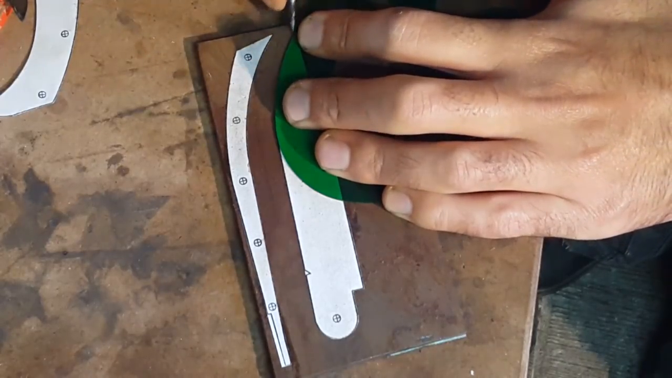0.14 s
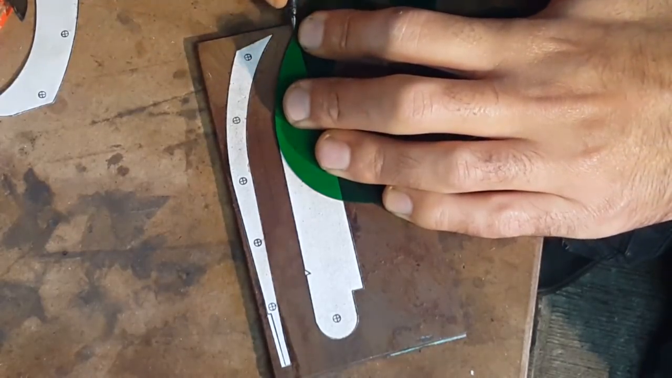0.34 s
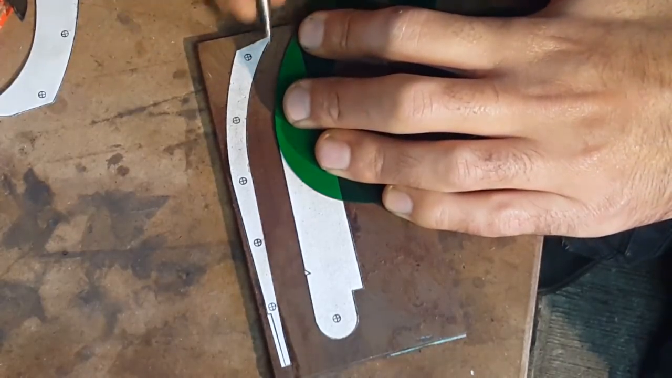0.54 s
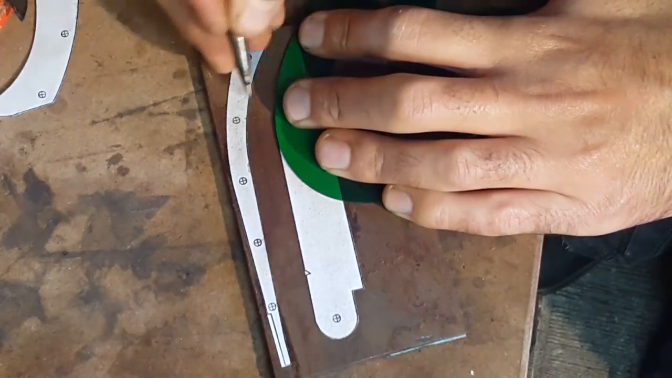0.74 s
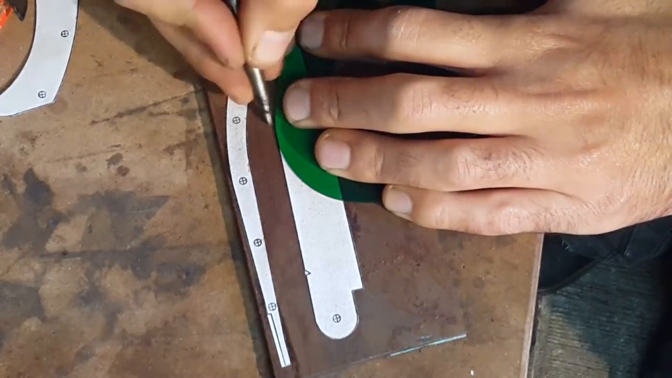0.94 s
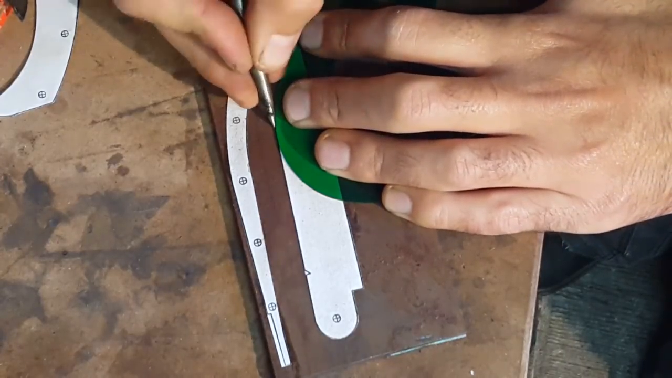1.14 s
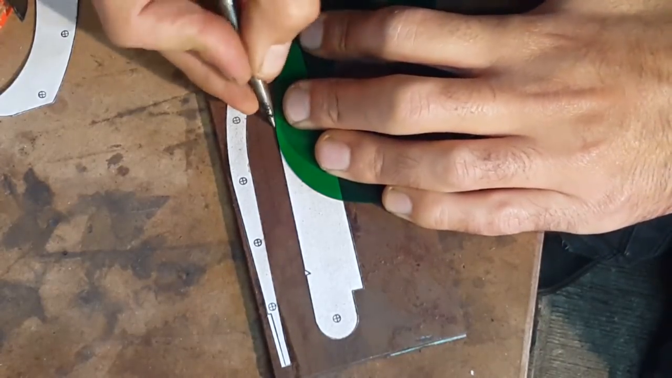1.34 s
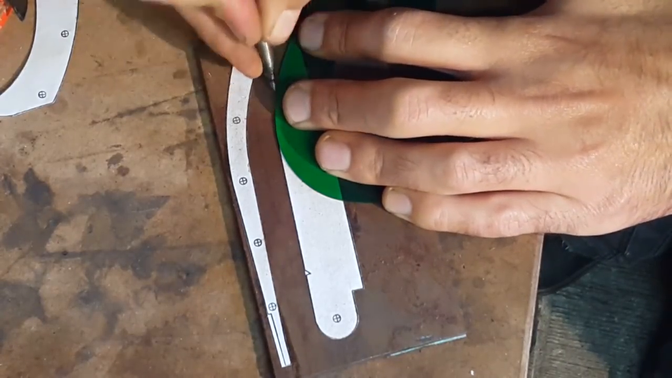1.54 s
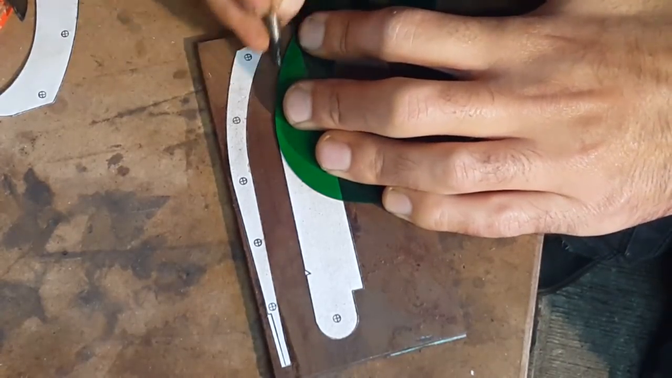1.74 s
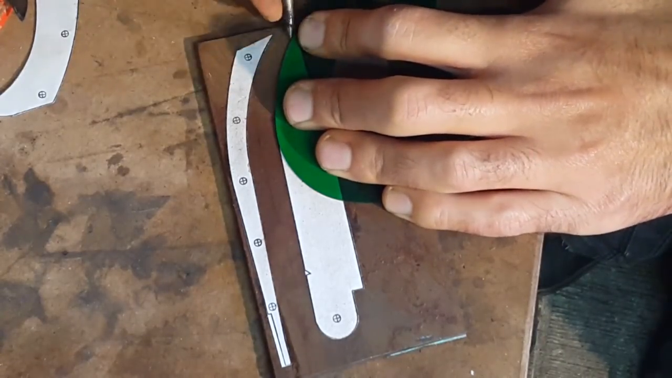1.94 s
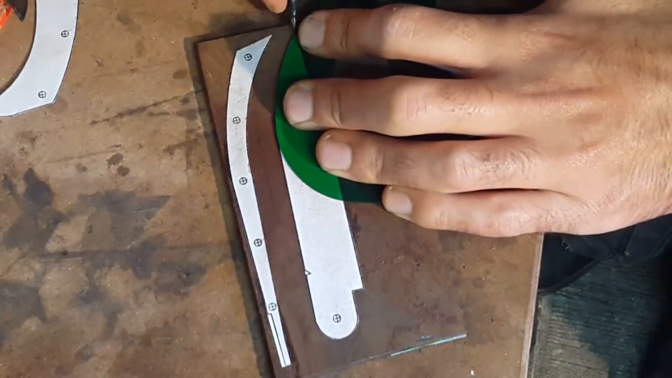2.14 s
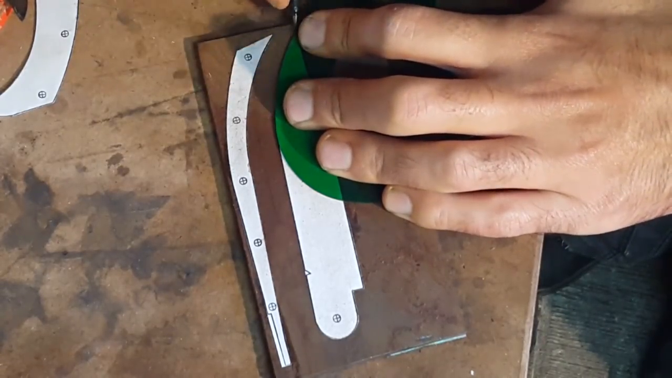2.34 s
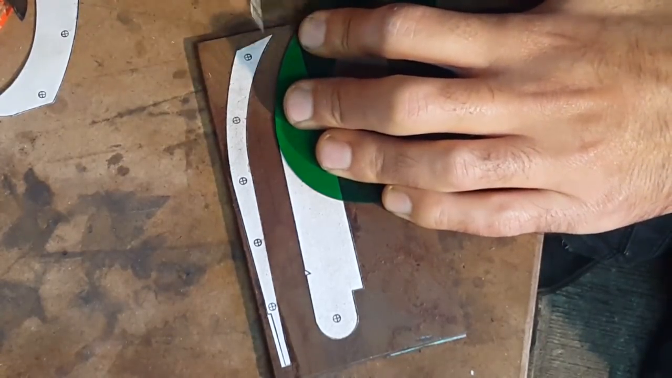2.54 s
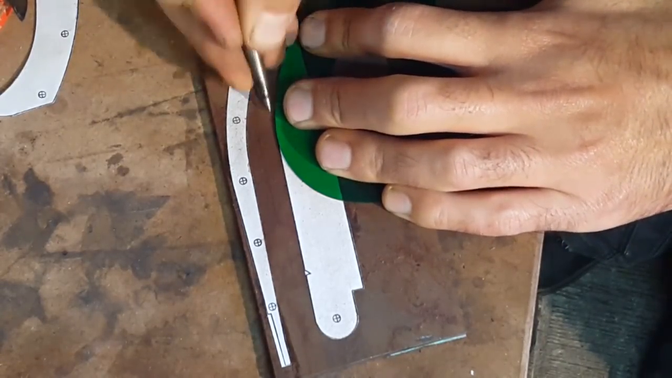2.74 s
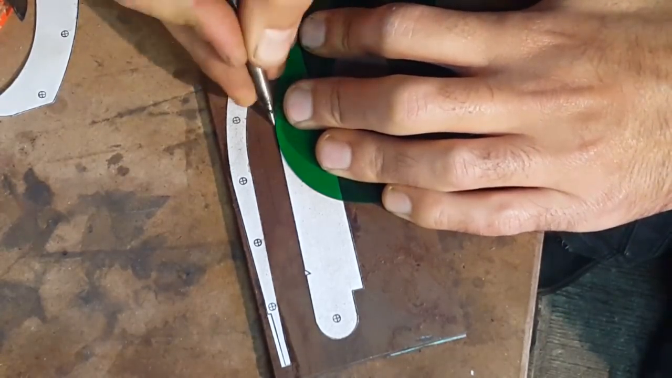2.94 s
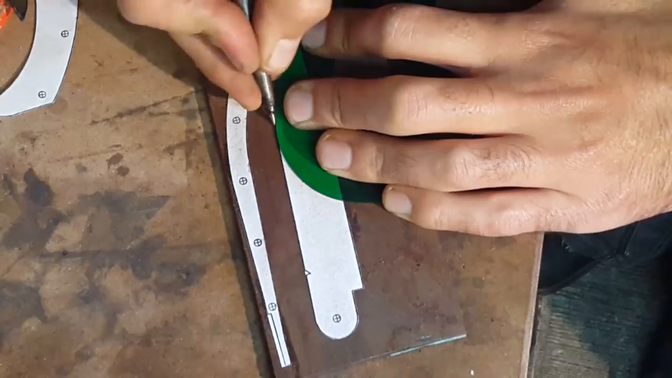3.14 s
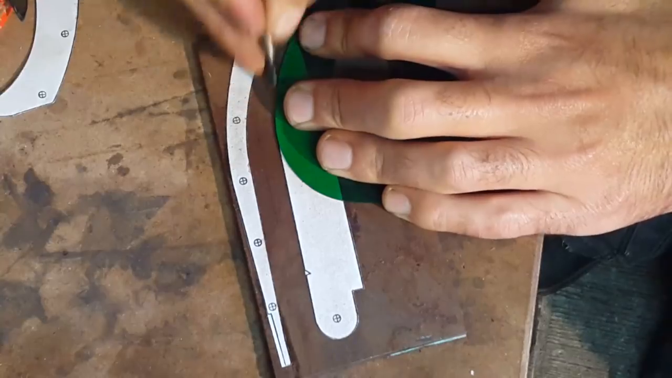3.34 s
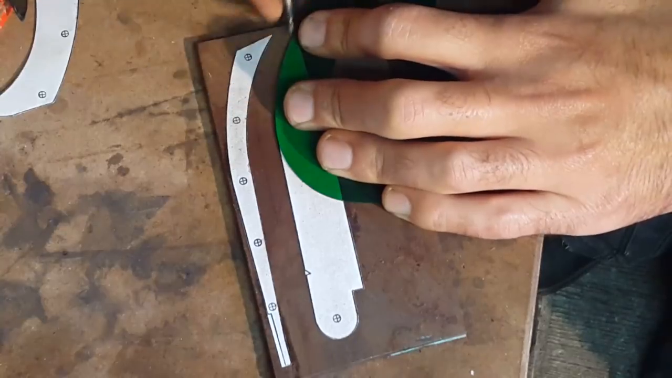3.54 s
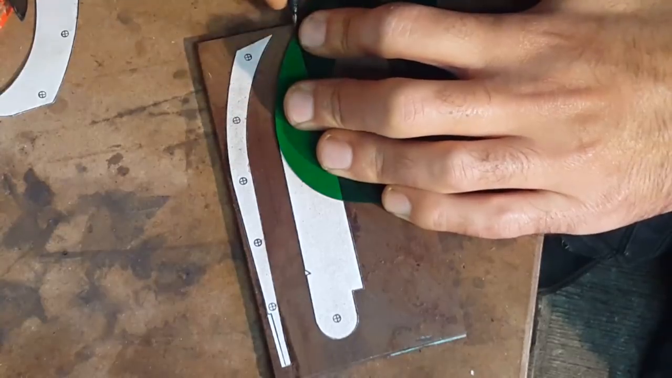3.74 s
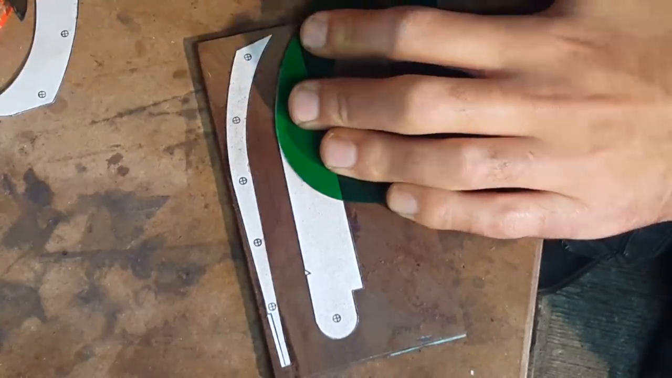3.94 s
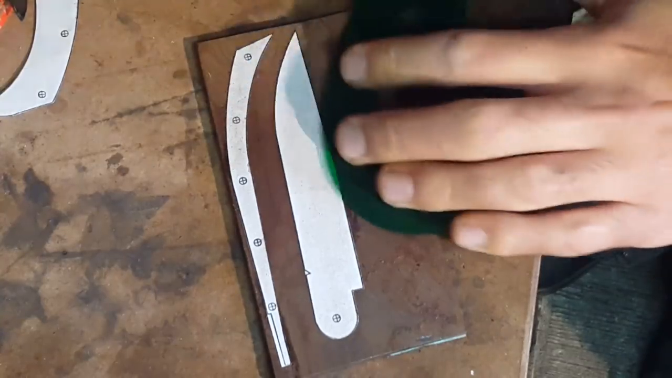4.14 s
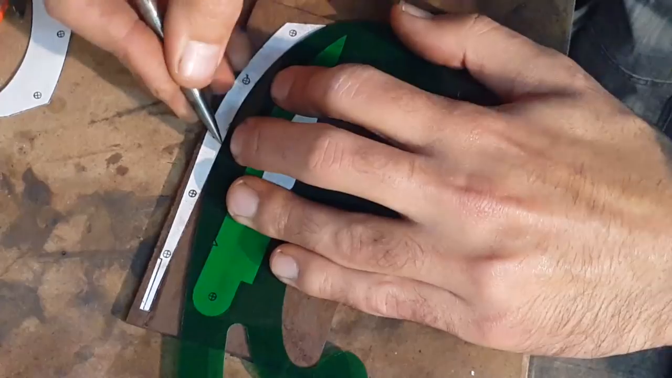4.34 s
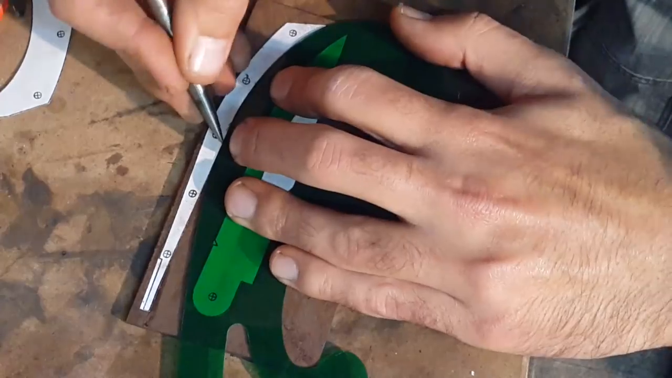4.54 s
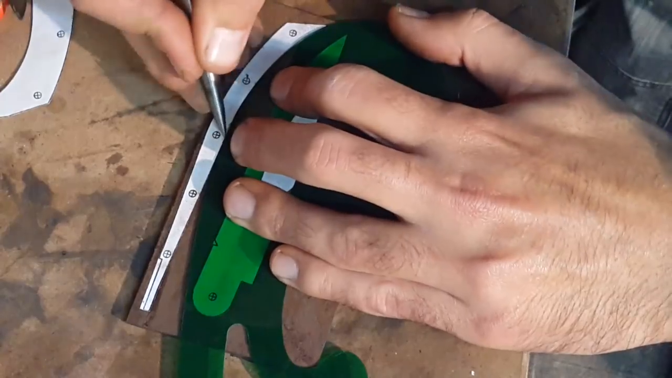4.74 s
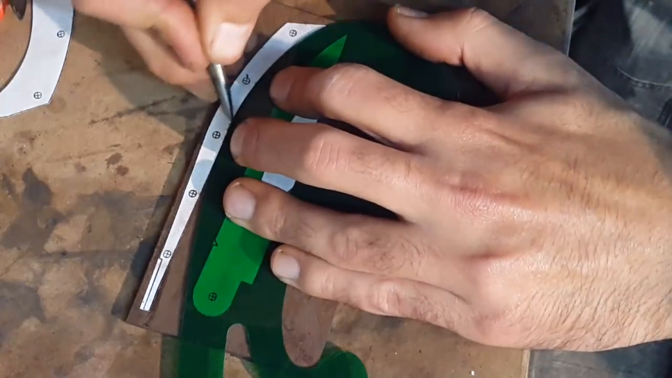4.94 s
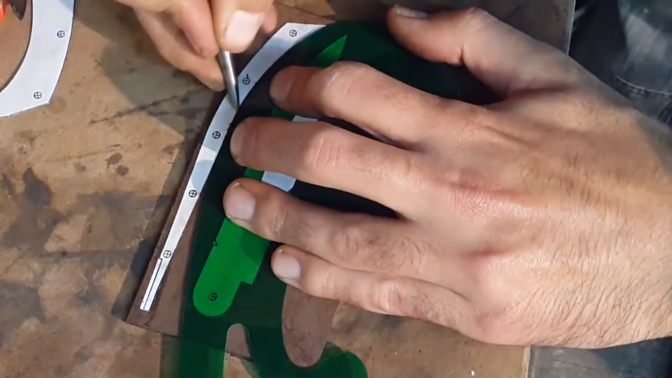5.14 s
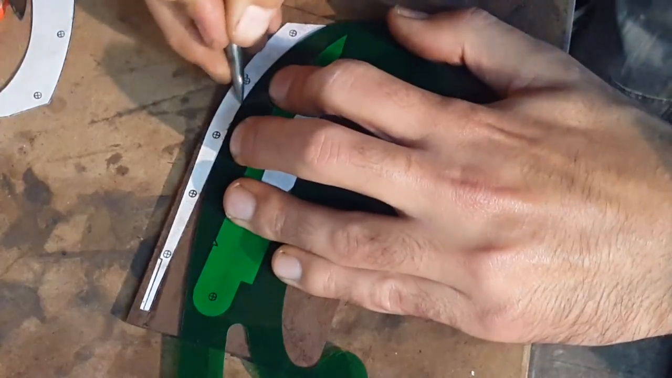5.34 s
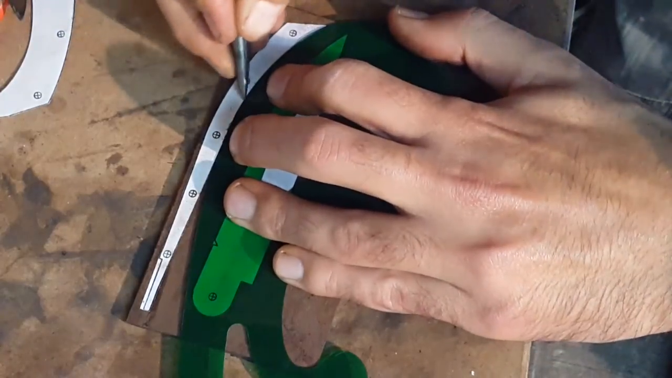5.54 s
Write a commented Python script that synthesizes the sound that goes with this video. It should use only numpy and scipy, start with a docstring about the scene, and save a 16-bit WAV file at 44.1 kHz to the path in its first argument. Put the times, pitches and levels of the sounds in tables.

```python
"""A steel scribe jerks along a plastic template over a plate on a wooden board, close up in a quiet workshop.
Every jerk or tap is a burst of tiny slips, with a snap just after they set in, that rings the modes of board,
plate and scribe. The bench thuds below; grit hisses under finger and template; the template hums as it is
dragged aside. Then the board is turned and the modes change level. Faint high notes and room tone lie behind.
Two microphone ports hear each mode differently; the shop answers with a short reverberation."""
import sys
import numpy as np
from scipy import signal
from scipy.io import wavfile

SR = 44100
rng = np.random.default_rng(int(sys.argv[2]) if len(sys.argv) > 2 else 0)


def unload_wav(signal):
    """Save mono or channel-first audio to the path in sys.argv[1] as 16-bit WAV at rate SR, clipped to [-1, 1]."""
    wavfile.write(
        sys.argv[1],
        SR,
        np.round(np.clip(np.atleast_2d(signal).T, -1, 1) * 32767).astype(np.int16),
    )


N = 250920  # samples

# jerks and taps of the point: [t/s, relative level/dB, rise/s, bass fade t60/s,
# then against that level: weight/dB, plate/dB, bite/dB, treble/dB]
JERKS = [(0.0,-23.5,0.0046,0.14,-16,-17,-15.5,-25), (0.029,-35.5,0.0073,0.19,-1,1,-12,-27),
         (.058,-38.5,0.0015,0.24,-2,-9,-1.5,-20), (.299,-43,0.0093,0.18,-3,-1,-6,-25),
         (.539,-43.5,0.0038,0.083,-25,-13,-9,-28), (0.859,-46,.015,0.086,-16,-6,-11,-17.5),
         (.886,-39.5,0.0013,0.23,-17,-15,-10,-25), (1.136,-39,.006,.1,-25,-15.5,-44,-48),
         (1.274,-51,.005,.1,-17,-13,-24,-23), (1.541,-48.5,0.007,0.96,-8,-11,-20,-30),
         (1.591,-38.5,0.0055,0.31,-8,-9,-21,-22.5), (1.611,-36.5,0.0035,0.37,-10.5,-5.5,-18,-21),
         (1.633,-34.5,0.011,0.37,-2,0.5,-14,-20.5), (1.661,-28.5,0.008,0.17,-22,-3,-13.5,-25),
         (1.686,-32,0.0071,0.056,-6.5,5,-26,-25), (1.753,-27,0.013,0.1,-16,-8.5,-15.5,-29.5),
         (1.773,-34.5,0.0022,0.38,-8,-20,-3,-24.5), (1.844,-31.5,0.0039,0.62,-10,-10,-5.5,-23.5),
         (1.877,-25.5,0.0089,0.49,-12.5,-9,-5.5,-34), (1.923,-21,0.0054,0.35,-18.5,-13,-10,-29),
         (1.97,-29.5,0.0041,0.16,-17,-28,-11,-28.5), (2.019,-26.5,0.0075,0.18,-14.5,1.5,-1,-23),
         (2.05,-23.5,0.0025,0.14,-13.5,-23,-13,-32), (2.19,-28,0.0035,0.2,-9.5,-6,-14.5,-32),
         (2.218,-28,0.0065,0.11,-15.5,-12.5,-8.5,-26), (2.316,-46.5,0.0055,0.32,-8,-19,-15,-22.5),
         (2.398,-27.5,0.0048,0.1,-12.5,-16.5,-16,-27.5), (2.603,-43.5,0.0067,0.15,-27,-20.5,-21.5,-35),
         (2.754,-68.5,0.015,.21,7,-11,3,-8), (3.038,-28.5,0.0019,0.13,-28.5,-10.5,-35,-33),
         (3.074,-36,0.016,0.13,-20,-12.5,-26,-33), (3.321,-44,0.0076,.22,-9,-21,-21,-32),
         (3.353,-38,0.0076,0.14,-23,-7.5,-20,-30), (3.375,-40.5,0.0027,0.31,-7.5,-11.5,-12.5,-19.5),
         (3.445,-27.5,0.022,0.69,-15,-8.5,-16.5,-27), (3.481,-26,0.0084,0.059,-29,0.5,-20,-30),
         (3.548,-27.5,0.021,0.27,-8.5,-8.5,-7,-29), (3.583,-25,0.0052,0.098,-21.5,-13,-8,-25.5),
         (3.602,-36,0.0026,0.35,-9,-3,-3.5,-22.5), (3.651,-28.5,0.011,0.37,-10,-2,-3,-21.5),
         (3.697,-34,0.0034,0.26,-12,-14,-6,-19), (3.777,-32.5,0.0053,0.094,-9,-14,-2,-29),
         (3.813,-38.5,0.0066,0.22,-12.5,-38,-6,-43), (4.366,-61,0.0054,0.12,-12,-22,-11,-19),
         (4.802,-38,0.0037,0.2,-20,-10,-20,-33.5), (4.851,-40.5,0.01,0.16,-20,-15,-16,-23),
         (4.898,-60,.007,.14,-14,-18,1,-8), (4.991,-33,0.036,.3,-19,-16,-28,-33),
         (5.023,-21,0.0086,0.055,-43,-17.5,-50,-46), (5.037,-22,0.0041,0.22,-30,-15.5,-30,-29.5),
         (5.052,-32,0.0059,0.21,-17,-8.5,-10,-22.5), (5.115,-27.5,0.014,.1,-26,-14,-15,-25.5),
         (5.129,-26,0.013,0.12,-16,-7,-7,-23.5), (5.168,-38.5,0.0083,0.24,-10.5,-21,0.5,-35),
         (5.251,-41,0.0063,0.39,-12,-12.5,-6,-26.5), (5.323,-36,0.0051,0.077,-7.5,-14,-12,-27.5),
         (5.338,-30.5,0.0025,0.14,-13.5,-16.5,-7,-28.5), (5.398,-53,.007,0.14,-3,-15,-1,-19),
         (5.486,-29.5,0.0039,0.12,-21,-10,-22,-28), (5.505,-27.5,0.0076,0.08,-14.5,-7,-12.5,-25.5),
         (5.517,-45,.006,0.27,-1,-4,0,-14)]
# colour of a jerk: [f/Hz, level/dB]; weight acts on the first point, plate on the third,
# bite on the fourth, treble on the last three
JERK_COLOUR = [(250, -2.23), (730, -2.26), (1250, -1), (2000, -8), (3000, -6), (4800, -6.5), (7000, -11)]
# modes of board, plate and scribe: [f/Hz, t60/s, right level/dB, left minus right level/dB,
# left lead/rad, level change once the board is turned/dB]
MODES = [(99.2, 0.41, -12, -4.5, -0.2, 3), (133.2, 0.19, -1, -1, 0.35, -2),
         (211, 0.064, -3.5, -3.5, -0.07, 5), (322, 0.13, -2, -1, 0.5, -1.5),
         (369.1, 0.19, -5, 0, -0.5, -4.5), (502.5, 0.044, -7.5, -4, 1.5, -0.5),
         (595.4, 0.11, -10.5, -7, 0.97, 9.5), (703, 0.044, 6, -14, -1, -2), (757, 0.027, 6.5, -27, 1.8, -4),
         (803, 0.067, -7, -32.5, -1.5, -16), (864, 0.099, -6, -25.5, 0.8, -0.5),
         (999, 0.033, 0, -11.5, 4.5, -3), (1021, 0.05, -0.5, -15.5, 5.5, -1),
         (1206, 0.032, 2.5, -16.5, -5.1, -1.5), (1360, 0.033, 1, 0, 4.5, 2.5),
         (1398, 0.025, 1.5, 0.5, -2.14, 1), (1523, 0.069, -1, -26, -2, 0),
         (1703, 0.026, 1, -1.5, -0.6, -3.5), (1886, 0.026, 4, -9, 3, -6), (1999, 0.1, -4, 4.5, 2, -8.5),
         (2140, 0.061, 0.5, -5, 1.1, -6.5), (2317, 0.044, 3, -6, -1, -3), (2807, 0.028, -2.5, -3, -3, 7),
         (3018, 0.016, -3.5, 11, 0.64, -2.5), (3840, 0.0049, -3, 6, 6.5, -1),
         (4180, 0.014, 2.5, 2.5, -2, -3), (4660, 0.0077, -2, 8, -4, 3.5), (6000, 0.0055, 0, -5.5, 1, -1.5),
         (7017, 0.019, 8.5, -5, 2.5, 0), (11500, .008, -7.5, -17, 8, 3)]
# sway of the bench under the pressing hand: [t/s, level/dB before the port gains]
BENCH = [(0.0, -51), (0.24, -72.5), (0.33, -65), (0.41, -73), (1.44, -77), (1.88, -47.5), (2.31, -54),
         (2.6, -77), (2.66, -62), (2.85, -72), (3.33, -70.5), (3.41, -60), (3.63, -54.5), (3.71, -65),
         (4.52, -77), (4.83, -66.5), (5.66, -66), (5.69, -80)]
# room tone, spectrum: [f/Hz, relative level per Hz/dB]
AIR = [(25, -14), (45, 7), (70, -4.5), (200, 0.5), (260, -3.5), (420, -3), (520, 5), (620, -13), (760, 2.5),
       (950, -13), (1400, -13.5), (2500, -19.5), (4000, -24), (6500, -28.5), (10000, -29), (16000, -27)]
# room tone, balance of the ports: [f/Hz, left minus right level/dB]
AIR_BALANCE = [(60, -2), (300, -1), (540, -5), (730, -11), (1000, -2), (3300, 1), (4500, 5), (6000, -1),
               (15000, -1)]
# room tone, likeness of the ports: [f/Hz, correlation from -1 to 1]
AIR_LIKENESS = [(40, .95), (100, .75), (700, .6), (1000, -.2), (2000, .1), (8000, 0)]
# grit, one list under the sliding finger, one under the sliding template: [t/s, level/dB]
GRIT = [
    [(0.62, -95), (0.65, -98), (0.674, -76), (0.844, -75.5), (0.866, -61.5), (0.974, -72), (0.99, -83)],
    [(4.09, -91), (4.114, -61), (4.122, -70.5), (4.186, -59.5), (4.284, -73), (4.3, -86)],
]
# treble resonances of the grit under the finger: [f/Hz, width/Hz, relative level/dB]
FINGER_PEAKS = [(2440, 1300, -12.5), (4500, 4800, -17)]
# treble resonances of the grit under the template: [f/Hz, width/Hz, relative level/dB]
TEMPLATE_PEAKS = [(5060, 1800, 17.5), (7110, 91, 15), (5800, 2000, 5), (4100, 720, -11), (9500, 3500, -32)]
# faint high notes, perhaps birds outside: [t/s, length/s, first f/Hz, last f/Hz, level/dB]
CHIRPS = [(1.152, 0.13, 4300, 5850, -78), (2.337, 0.18, 4250, 4260, -79.5), (3.951, .12, 4200, 4600, -79),
          (4.158, .13, 4130, 3810, -67), (5.205, 0.12, 4080, 3970, -75), (5.567, 0.13, 4150, 3850, -70)]
# the dragged template sticks and lets go, and the board hums: [t/s, peak level/dB before the port gains]
JUDDERS = [(3.813, -49), (3.839, -53.5), (3.894, -46), (3.966, -51), (4.033, -49.5), (4.108, -52),
           (4.14, -47.5), (4.221, -51.5), (4.257, -57), (4.322, -59), (4.349, -79), (4.389, -69),
           (4.452, -83)]

SLIPS_PER_S, SLIP_SPREAD_DB = 4000, 1.5
CHATTER_HZ, CHATTER_DB = 94, 0.5  # pace and depth of the clumps of slips
JERK_DB, STRIKE_SPREAD_DB = -5, 1.5  # common gain; chance spread for each jerk and mode
TREBLE_FADE_HZ = 8550  # at this pitch a jerk fades twice as fast as in the bass
SNAP_DB, SNAP_LOSS_DB_PER_S = 27, 596  # the slower a jerk rises, the weaker its snap
CONTACT_S = 0.00025  # a blunt contact: the snap reaches the high modes less
TAP_PAUSE_S = 0.1  # a jerk after so long a pause is a tap: the point lands afresh
TAP_SNAP_DB, TAP_CLICK_DB, TAP_RING_DB = 1, 11, -8  # a tap snaps and clicks more, rings the scribe less
APART_HZ = 2480  # above this pitch the ports hear mostly unlike slips
TURNED_S = 4.5
SHOP_T60_S, WALL_CUT_HZ, SHOP_LOW_HZ, SHOP_DB = 0.19, 9300, 350, -8
BENCH_HZ, BENCH_WIDTH_HZ = 71, 6
AIR_DB = -63
CHIRP_EDGE_S = 0.017  # soft ends
JUDDER_RISE_S, JUDDER_T60_S = 0.016, 0.3
DRAG_HZ, DRAG_SAG_HZ_PER_S = 705, 25  # pitch at the first judder, and its fall
DRAG_WIDTH_HZ = 90
DRAG_CLEAR_UNTIL_S, DRAG_BREAK_UP_S = 4.08, 0.06  # the hum is clear at first, then breaks up into noise
RUMBLE_CUT_HZ, CUTOFF_HZ = 42.4, 15900


def from_db(db):
    """Decibels to amplitude gain."""
    return 10 ** (np.asarray(db) / 20)


def rms_one(x):
    """Scales a signal to rms 1."""
    return x / np.sqrt(np.mean(x ** 2) + 1e-20)


def in_time(rows):
    """Columns of a curve at every sample, after a gate that fades out just beyond its ends."""
    s, *columns = np.transpose(rows)
    t = np.arange(N) / SR
    gate = np.clip(np.minimum(t - s[0], s[-1] - t) / 0.008 + 1, 0, 1)
    return [gate] + [np.interp(t, s, column) for column in columns]


def at_hz(points, hz):
    """Reads a spectrum on a log frequency axis."""
    f, level = np.array(points).T
    return np.interp(np.log(hz), np.log(f), level)


def ring(force, hz, t60, lead=0.0):
    """One damped mode as a two-pole resonator, started at a given phase; steady unit noise gives rms 1."""
    r = from_db(-60 / (t60 * SR))
    w = 2 * np.pi * hz / SR
    start = np.array([np.sin(lead), r * np.sin(w - lead)])
    b = np.sqrt(2 * (1 - r * r)) * start
    return signal.lfilter(b, [1, -2 * r * np.cos(w), r * r], force + 1e-18)


def slips(per_s, spread_db):
    """Stick-slip friction: random tiny slips of uneven size that come in clumps; rms 1."""
    size_db = spread_db * np.minimum(rng.exponential(1, N), 5)
    sizes = from_db(size_db) * rng.choice([-1, 1], N)
    r = np.exp(-2 * np.pi * CHATTER_HZ / SR)
    clumps = rms_one(signal.lfilter([1], [1, -2 * r, r * r], rng.standard_normal(N)))
    happens = rng.random(N) < per_s / SR
    return rms_one(sizes * happens * from_db(CHATTER_DB * clumps))


def wavering(hz, width_hz, steady=0.0):
    """A tone that follows a pitch track, blurred by slow noise around a steady part; rms 1."""
    r = np.exp(-np.pi * width_hz / SR)
    slow = rms_one(signal.lfilter([1], [1, -r], rng.standard_normal((2, N))))
    phase = 2 * np.pi * np.cumsum(hz + np.zeros(N)) / SR
    return rms_one((steady + slow[0]) * np.cos(phase) + slow[1] * np.sin(phase))


def scratching():
    """Each jerk is a snap amid slips; it drives every mode of board, plate and scribe at its own strength."""
    s, level_db, rise, fade, weight, plate, bite, treble = np.transpose(JERKS)[:, :, None]
    rise = np.maximum(rise, 0.001)
    tap = np.diff(s, axis=0, prepend=0) > TAP_PAUSE_S
    t = np.arange(N) / SR
    ms = np.arange(0, N / SR + 0.002, 0.001)  # a coarse clock in s, for the envelopes
    age = ms - s + 0.0033  # the slips set in just before the catch
    decay = from_db(-120 * np.clip(age - rise, 0, 1) / np.maximum(fade, 0.01))
    power = np.clip(age / rise, 0, 1) ** 2 * decay
    luck = rng.normal(0, STRIKE_SPREAD_DB, (len(JERKS), len(MODES)))
    train = slips(SLIPS_PER_S, SLIP_SPREAD_DB)
    other = slips(SLIPS_PER_S, SLIP_SPREAD_DB)
    snap_at = (np.maximum(s[:, 0] - 0.002, 0) * SR).astype(int)
    colour_axis = np.log(np.array(JERK_COLOUR)[:, 0])
    out = np.zeros((2, N))
    for k, (hz, t60, right_db, left_db, lead, turned_db) in enumerate(MODES):
        # how much each colour point counts at this pitch
        share = [np.interp(np.log(hz), colour_axis, row) for row in np.eye(7)]
        colour_db = at_hz(JERK_COLOUR, hz) + share[0] * weight + share[2] * plate
        colour_db = colour_db + share[3] * bite + sum(share[4:]) * treble
        colour_db += tap * (share[4] * TAP_CLICK_DB + share[6] * TAP_RING_DB)
        mode_db = right_db + turned_db * (s > TURNED_S)
        strength = from_db(JERK_DB + level_db + colour_db + mode_db + luck[:, [k]])

        # higher up the left port hears other parts of the plate, stirred by slips of their own
        alike = 1 / np.hypot(1, hz / APART_HZ)
        trains = np.array([alike * train + np.sqrt(1 - alike ** 2) * other, train])
        mode_power = power ** (1 + hz / TREBLE_FADE_HZ)
        envelope = np.sqrt((strength ** 2 * mode_power).sum(axis=0))
        force = trains * np.interp(t, ms, envelope)
        snap_db = SNAP_DB + tap * TAP_SNAP_DB - SNAP_LOSS_DB_PER_S * rise
        snap = (strength * from_db(snap_db))[:, 0]
        force[:, snap_at] += snap / np.hypot(1, hz * CONTACT_S)

        # the plate passes little of a mode far above its pitch
        soften = signal.butter(2, min(2.2 * hz, 18000), fs=SR, output="sos")
        left, right = signal.sosfilt(soften, force + 1e-18)
        sense = (-1) ** k  # neighbouring modes move in opposite senses
        out[0] += sense * from_db(left_db) * ring(left, hz, t60, lead)
        out[1] += sense * ring(right, hz, t60)
    return out


def shop(x):
    """Reverberation of the shop: ten feedback delays a side, duller on every round."""
    out = np.zeros((2, N))
    dull = np.exp(-2 * np.pi * WALL_CUT_HZ / SR)
    lags = (np.geomspace(0.0231, 0.0603, 20) * SR).astype(int)
    for k, lag in enumerate(lags):
        loop = x[k % 2].copy()
        gain = from_db(-60 * lag / SR / SHOP_T60_S)
        state = [0.0]
        for i in range(lag, N, lag):  # one block per round trip
            back, state = signal.lfilter([gain * (1 - dull)], [1, -dull], loop[i - lag:i], zi=state)
            loop[i:i + lag] += back[:N - i]
        echoes = loop - x[k % 2]
        out[k % 2] += echoes * (-1) ** (k // 2)
    return out


def bench():
    """The bench sways in one low wavering mode, the same at both ports but for a small level offset."""
    _, level_db = in_time(BENCH)
    port_gain = from_db([[-1], [0.8]])
    return from_db(level_db) * wavering(BENCH_HZ, BENCH_WIDTH_HZ, steady=2.5) * port_gain


def air():
    """Room tone: third-octave bands of stereo noise, each with its own level, balance and likeness."""
    out = 0
    edges = 25 * 2 ** np.arange(0, 9.6, 1 / 3)
    white = rng.standard_normal((2, 2, N))  # neighbouring bands get unrelated noise
    for k, (low, high) in enumerate(zip(edges, edges[1:])):
        band = signal.butter(2, [low, high], "band", fs=SR, output="sos")
        mid, side = signal.sosfilt(band, white[k % 2])
        hz = np.sqrt(low * high)
        alike = np.clip(at_hz(AIR_LIKENESS, hz), -1, 1)
        balance_db = at_hz(AIR_BALANCE, hz) * np.array([[0.5], [-0.5]])
        gain = from_db(at_hz(AIR, hz) + balance_db)
        out = out + gain * (np.sqrt(1 + alike) * mid + np.sqrt(1 - alike) * side * [[1], [-1]])
    return from_db(AIR_DB) * rms_one(out)


def grit():
    """Dense grains crushed under a slide ring broad treble resonances, with separate grains at each port."""
    out = np.zeros((2, N))
    for slide, peaks in zip(GRIT, (FINGER_PEAKS, TEMPLATE_PEAKS)):
        gate, level_db = in_time(slide)
        for port in range(2):
            grains = slips(per_s=2800, spread_db=4.0)
            hiss = np.zeros(N)
            for hz, width_hz, peak_db in peaks:
                t60 = np.log(1000) / np.pi / width_hz
                hiss += from_db(peak_db) * ring(grains, hz, t60)
            # sqrt(2): the table gives the level of the two ports' mean
            out[port] += gate * from_db(level_db) * np.sqrt(2) * rms_one(hiss)
    return out


def chirps():
    """Faint blurred high notes, each a straight glide with soft ends, blurred separately at each port."""
    out = np.zeros((2, N))
    t = np.arange(N) / SR
    for s, length, first_hz, last_hz, level_db in CHIRPS:
        gate = np.clip(np.minimum(t - s, s + length - t) / CHIRP_EDGE_S, 0, 1)
        hz = np.interp(t, [s, s + length], [first_hz, last_hz])
        notes = np.array([wavering(hz, width_hz=170) for port in out])
        out += gate * from_db(level_db) * notes
    return out


def drag():
    """Stick-slip of the template: a narrow hum near the board's main mode swells at each judder."""
    t = np.arange(N) / SR
    swell = np.zeros(N)
    for s, peak_db in JUDDERS:
        rise = np.clip((t - s) / JUDDER_RISE_S, 0, 1)
        fall_db = -60 * np.clip(t - s - JUDDER_RISE_S, 0, 2) / JUDDER_T60_S
        swell += from_db(peak_db + fall_db) * rise
    hz = DRAG_HZ - DRAG_SAG_HZ_PER_S * (t - JUDDERS[0][0])
    steady = np.interp(t, [DRAG_CLEAR_UNTIL_S, DRAG_CLEAR_UNTIL_S + DRAG_BREAK_UP_S], [3.5, 1.2])
    # clear or broken up, the level stays
    hum = rms_one(wavering(hz, DRAG_WIDTH_HZ, steady) / np.hypot(steady, np.sqrt(2)))
    port_gain = from_db([[-13], [1.5]])  # mostly at the right port
    return swell * hum * port_gain


def scene():
    """Close sources, the scratching with a little room, over the room tone."""
    close = scratching()
    # the bass comes through the bench and stirs the room little
    no_bass = signal.butter(2, SHOP_LOW_HZ, "high", fs=SR, output="sos")
    airborne = signal.sosfilt(no_bass, close)
    room = from_db(SHOP_DB) * shop(airborne)
    return close + room + bench() + air() + grit() + chirps() + drag()


def record(dry):
    """At the microphone ports rumble is filtered off and the top is cut steeply."""
    no_rumble = signal.butter(4, RUMBLE_CUT_HZ, "high", fs=SR, output="sos")
    no_top = signal.cheby2(20, 40, CUTOFF_HZ, fs=SR, output="sos")
    return signal.sosfilt(no_top, signal.sosfilt(no_rumble, dry))


dry = scene()
out = record(dry)
unload_wav(out)
```